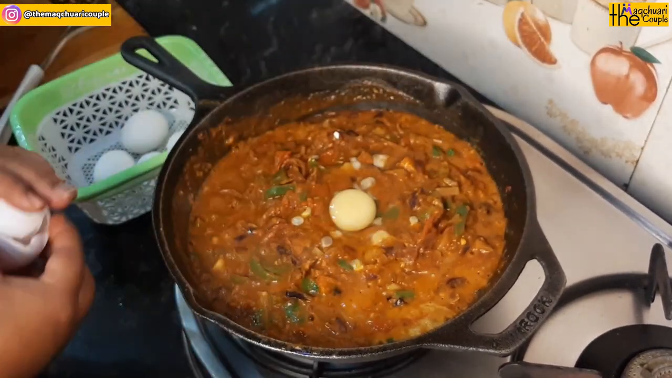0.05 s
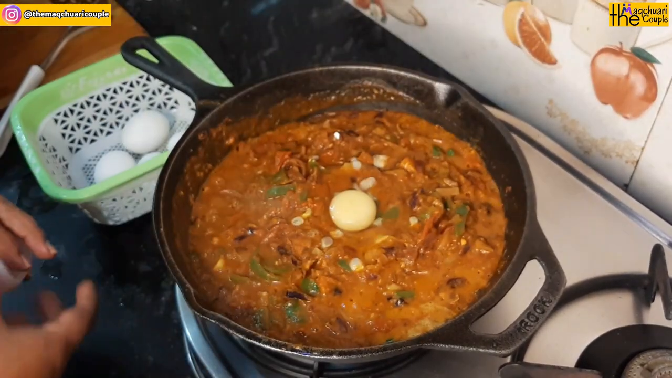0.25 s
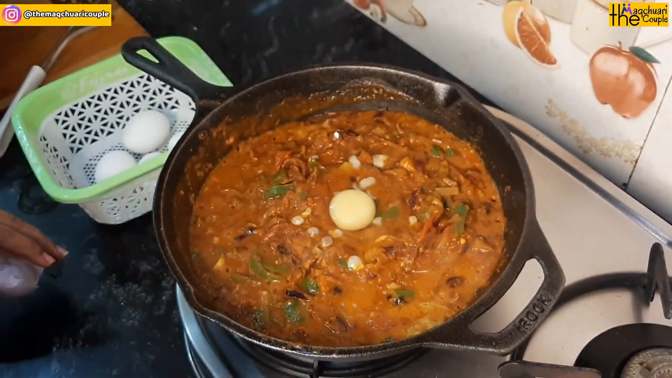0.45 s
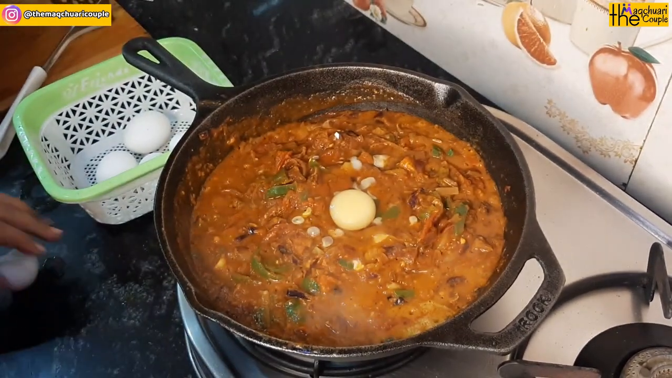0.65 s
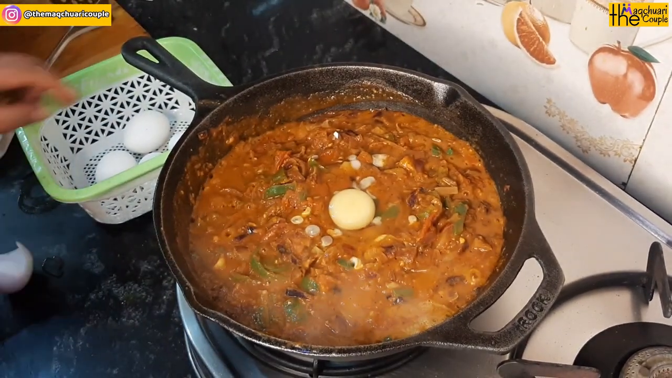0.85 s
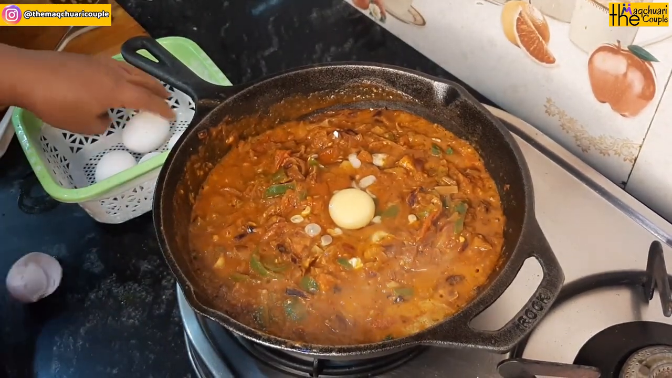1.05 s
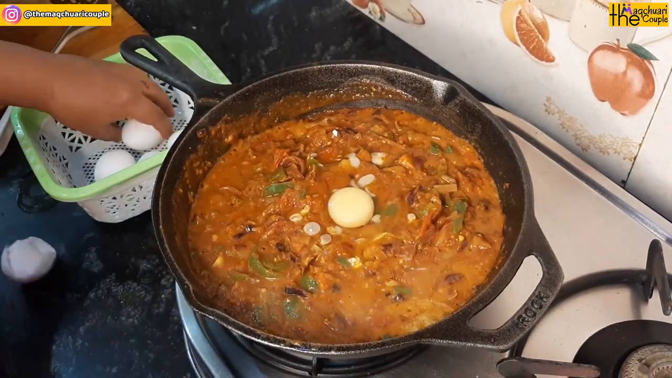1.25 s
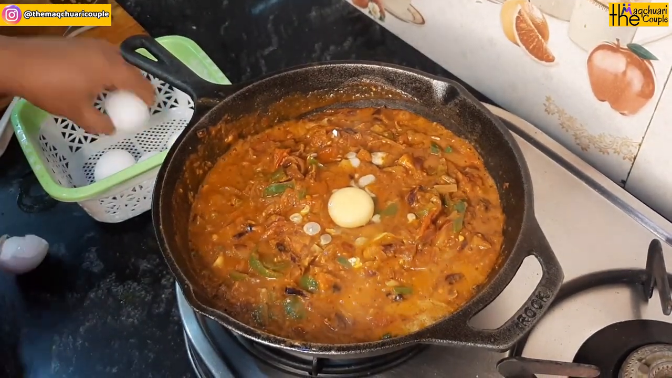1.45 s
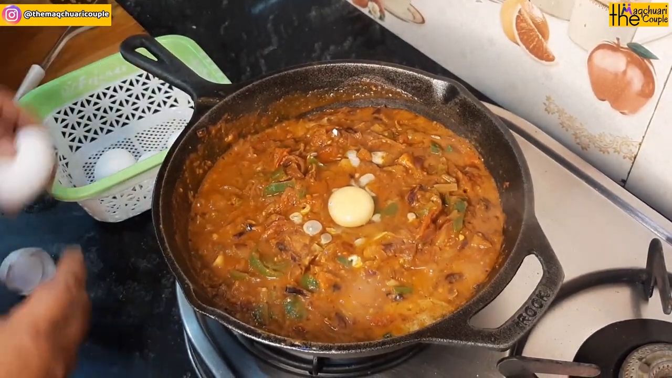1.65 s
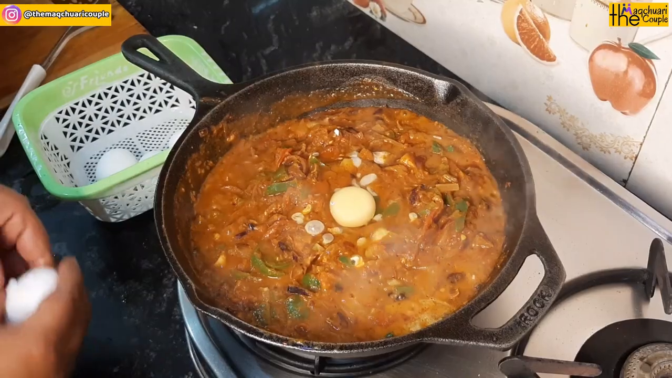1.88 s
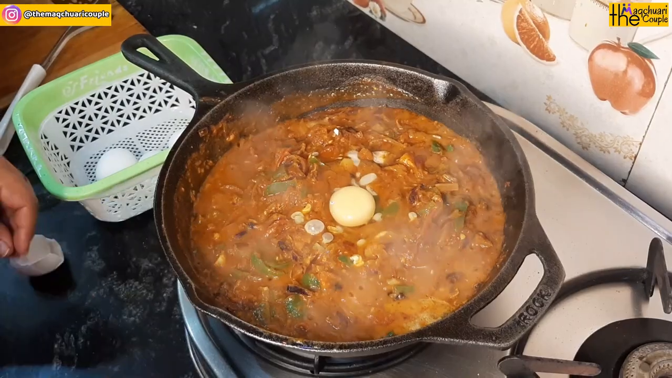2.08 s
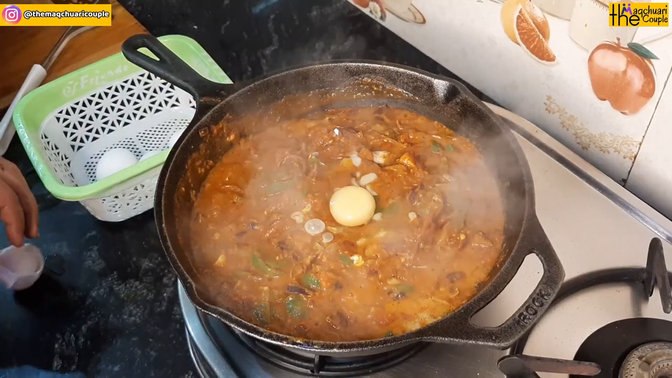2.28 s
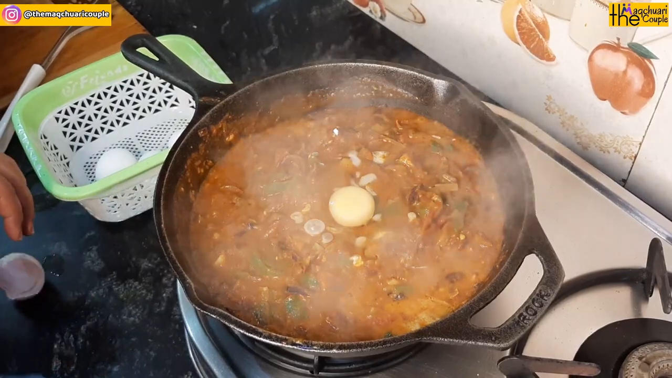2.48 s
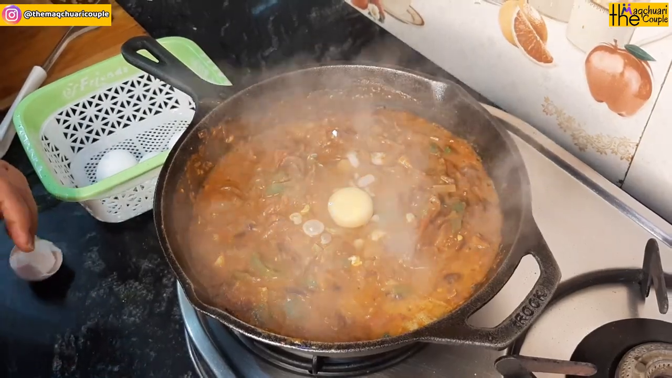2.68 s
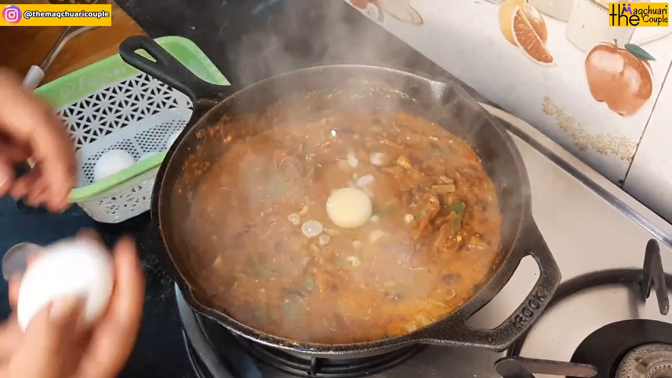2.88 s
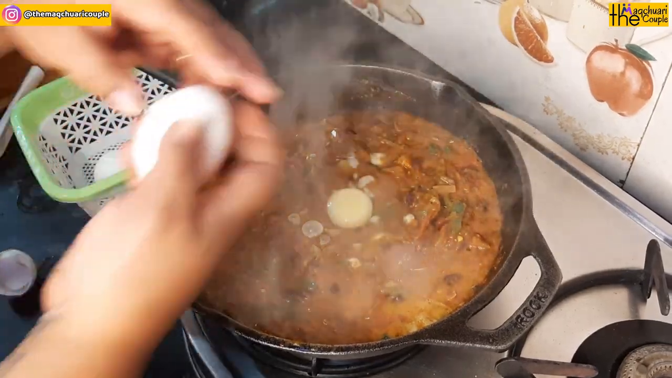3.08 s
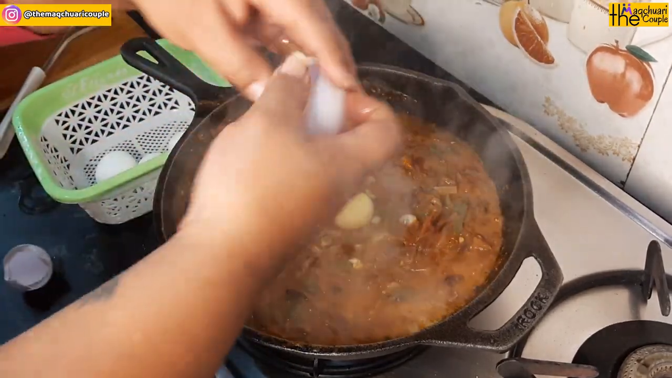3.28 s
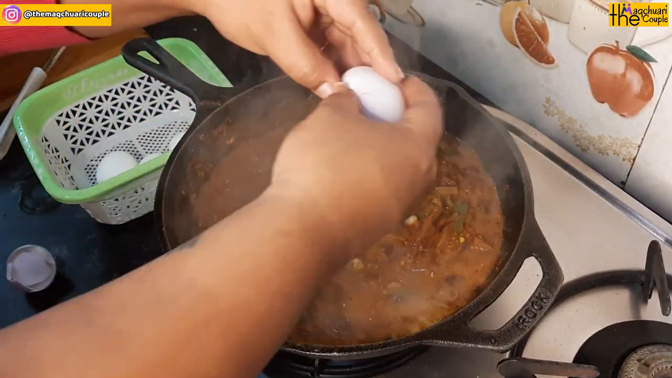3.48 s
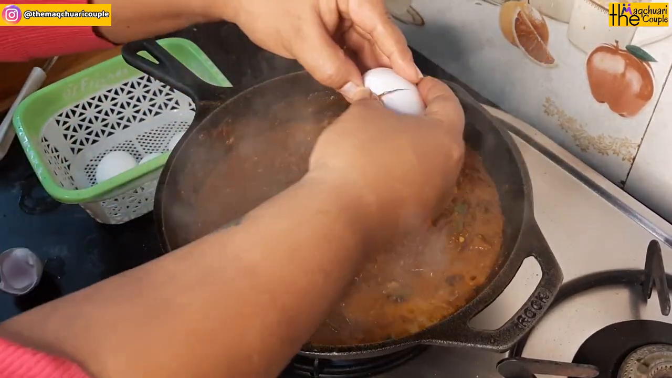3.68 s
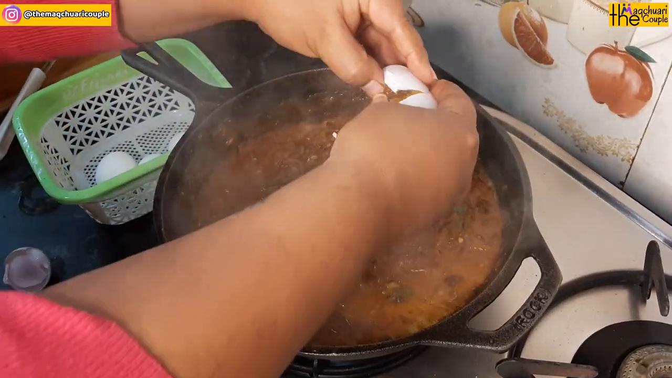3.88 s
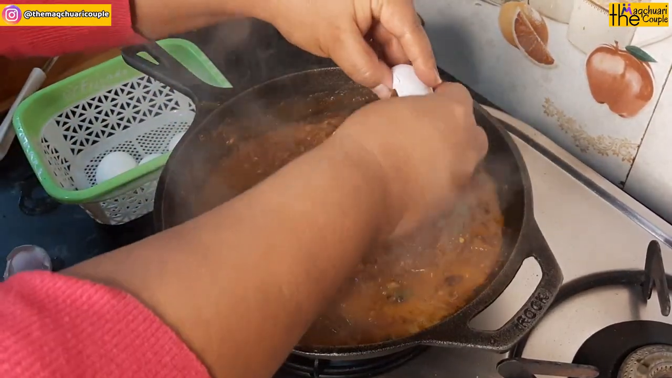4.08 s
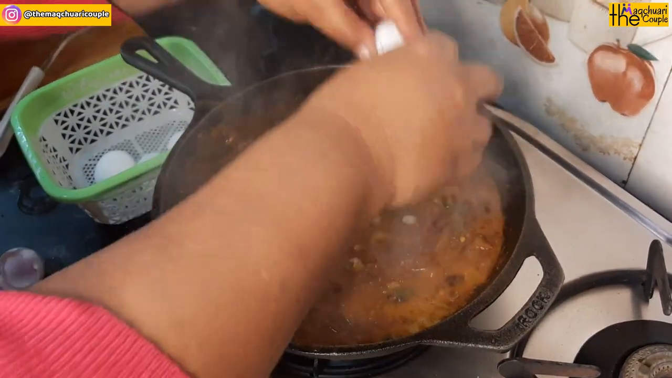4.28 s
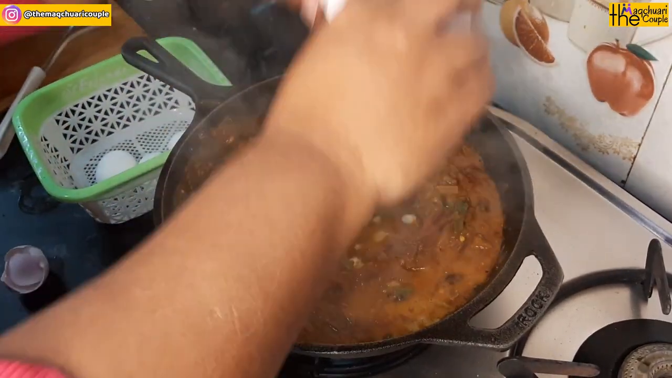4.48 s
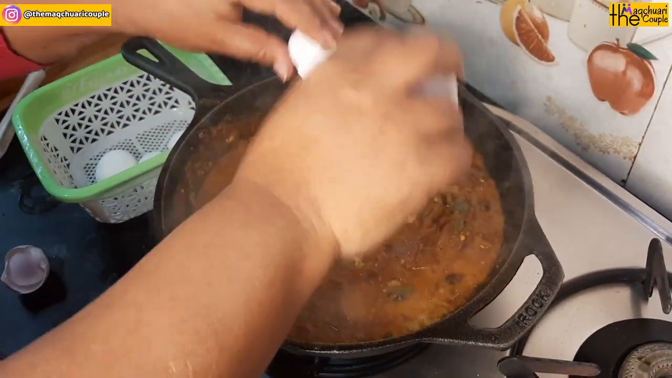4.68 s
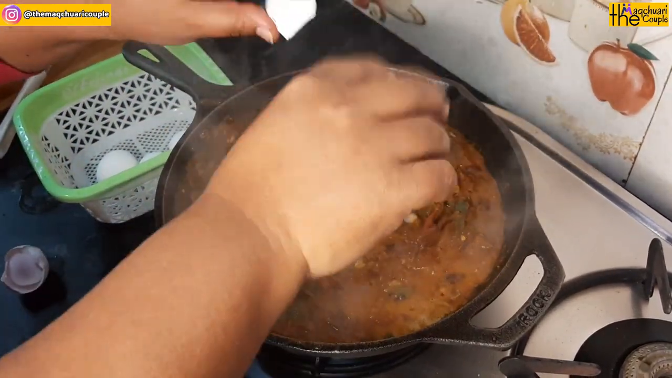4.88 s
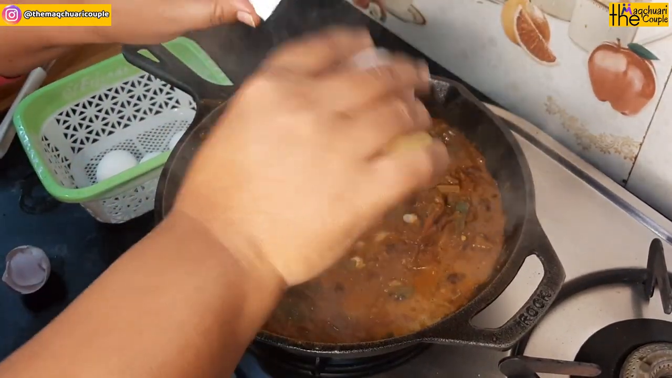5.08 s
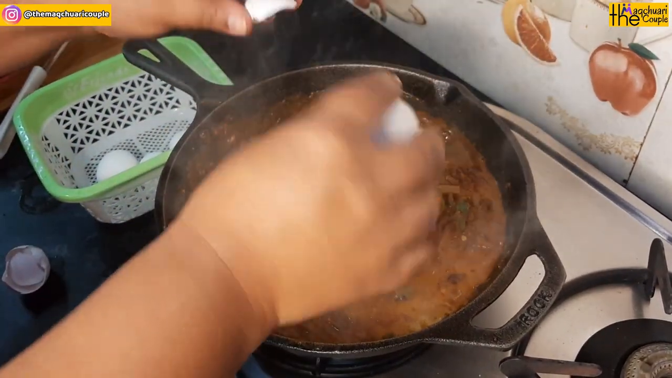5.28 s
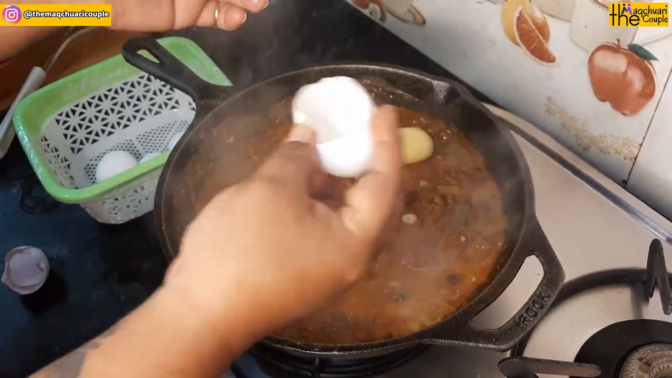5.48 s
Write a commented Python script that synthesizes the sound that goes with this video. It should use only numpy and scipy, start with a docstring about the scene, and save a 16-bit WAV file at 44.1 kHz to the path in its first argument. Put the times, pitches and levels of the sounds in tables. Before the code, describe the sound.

Gravy sizzles softly in a skillet throughout, a fine hiss with tiny bubble pops over the faint, low flutter of a gas flame. For the first 0.6 seconds an emptied eggshell crackles between fingers in short, brittle bursts. At 0.7 seconds it drops onto a stone counter with a sharp click and a brief hollow ring. From about 1.1 to 1.7 seconds come light taps as an egg is lifted from a plastic basket. At about 2.4, 2.55 and 2.7 seconds the egg is knocked on the counter, each crisp crack carrying a dull cabinet thump, the middle one weaker. From 3.5 to 4.3 seconds the shell is pulled apart with quieter crunches, snaps and ticks, and a faint low puff near 3.8 seconds. Only the sizzle and flame continue until the end, around 5.6 seconds. Everything sounds close, with the short reverberation of a tiled kitchen.

```python
"""An egg is knocked three times on a stone counter and pulled apart over a skillet in a tiled kitchen.
Its brittle shell fractures in bursts of tiny snaps, and each blow thumps the counter and its cabinet.
Before that, an emptied shell crackles in the fingers and is dropped, ringing like a small cup, and the
egg is lifted from a plastic basket with light taps. Throughout, bursting bubbles make gravy sizzle
softly over the low flutter of a gas flame."""
import sys
import numpy as np
from scipy import signal
from scipy.fft import rfft, irfft, next_fast_len
from scipy.io import wavfile

SR = 44100
rng = np.random.default_rng(int(sys.argv[2]) if len(sys.argv) > 2 else 0)


def dump_mix(stems):
    """Bounce the given channels to the path in sys.argv[1] as a 16-bit WAV at rate SR."""
    frames = np.atleast_2d(stems).T  # one column per channel
    limited = np.clip(frames, -1, 1)  # hard clip at full scale
    pcm = np.round(limited * 32767).astype(np.int16)
    wavfile.write(sys.argv[1], SR, pcm)


N = 244387
TIME = np.arange(N) / SR

# The empty shell lands. Each row: start in seconds, level in dB, thump in dB.
SHELL_DROPS = [(.679, 5.5, -18)]
# The egg hits the counter. Each row: start in seconds, crack in dB, thump in dB, egg's pitch in Hz.
EGG_KNOCKS = [(2.3675, 4.5, 2, 1523), (2.5445, -5.5, -2, 1520), (2.6748, 3.5, 0.5, 664)]


def from_db(db):
    """Amplitude grows tenfold with every 20 dB."""
    return 10 ** (np.asarray(db) / 20)


def unit_rms(x):
    """Normalisation to a mean power of 1."""
    return x / np.sqrt(np.mean(x ** 2) + 1e-20)


def unit_energy(x):
    """Normalisation to the energy of a unit impulse."""
    return x / np.sqrt(np.sum(x ** 2) + 1e-20)


def at_hz(points, hz):
    """Interpolation on a logarithmic frequency axis."""
    frequencies, values = np.transpose(points)
    return np.interp(np.log(np.maximum(hz, 1)), np.log(frequencies), values)


def add(track, start_s, sound):
    """Superposition: a short sound sums into a track."""
    i = max(int(round(start_s * SR)), 0)
    track[..., i:i + sound.shape[-1]] += sound[..., :N - i]


def pan(db):
    """Level difference between the channels; positive favours the left."""
    return from_db(np.array([[db], [-db]]) / 2)


def coloured(x, spectrum, size=8192):
    """Minimum-phase filtering: folding the cepstrum gives a causal response with this spectrum."""
    gain = from_db(at_hz(spectrum, np.fft.rfftfreq(size, 1 / SR)))
    cepstrum = irfft(np.log(gain))
    fold = np.r_[1, np.full(size // 2 - 1, 2), 1, np.zeros(size // 2 - 1)]
    response = irfft(np.exp(rfft(cepstrum * fold)))
    return np.apply_along_axis(lambda v: signal.fftconvolve(v, response)[:len(v)], -1, x)


def ring(x, hz, t60):
    """Damped resonance: one mode, falling 60 dB in t60 seconds and radiating no bass."""
    radius, angle = from_db(-60 / (t60 * SR)), 2 * np.pi * hz / SR
    return signal.lfilter([.5, 0, -.5], [1, -2 * radius * np.cos(angle), radius * radius], x + 1e-18)


def mode_cluster(x, hz, t60):
    """Modal vibration of a curved shell: a main mode and two weaker neighbours."""
    return unit_energy(ring(x, hz, t60) + 0.22 * ring(x, hz * 0.85, t60) + 0.25 * ring(x, hz * 1.12, t60))


def diffuse(pair):
    """A diffuse field is coherent at two nearby points in the bass and incoherent in the treble."""
    # Likeness of left and right. Each row: frequency in Hz, correlation.
    coherence = [(100, 0.91), (350, 0.77), (700, 0.75), (1100, 0.066), (1800, -0.074), (2800, -0.0072),
                 (5000, -0.024), (16000, 0.042)]
    size = pair.shape[1]
    fft_size = next_fast_len(size + SR // 20)
    alike = at_hz(coherence, np.fft.rfftfreq(fft_size, 1 / SR))
    mid, side = rfft(pair, fft_size) * np.sqrt([(1 + alike) / 2, (1 - alike) / 2])
    return irfft(np.array([mid + side, mid - side]), fft_size)[:, :size]


def clicks(per_s, spread_db, size):
    """A Poisson process: random impulses of either sign, a few much larger than the rest."""
    born = rng.random(size) < per_s / SR
    return born * rng.choice([-1, 1], size) * from_db(spread_db * np.minimum(rng.exponential(1, size), 4))


def snap_burst(envelope, per_s, spread_db):
    """Acoustic emission: tiny snaps under an envelope, radiating differently to left and right."""
    snaps = np.array([clicks(per_s, spread_db, len(envelope)) for _ in range(2)]) * envelope
    return np.sqrt(2) * unit_energy(diffuse(snaps))


def kitchen_response(early_db, tail_db, early_s=0.0013, build_s=0.0067):
    """Early reflections from counter, pan and tiles precede reverberation that decays band by band."""
    # The kitchen's decay. Each row: frequency in Hz, reverberation time in seconds.
    reverb_times = [(200, 0.41), (900, 0.62), (1800, 0.62), (5000, 0.51), (8000, 0.44), (15000, 0.36)]
    t, hz = TIME[:SR], np.fft.rfftfreq(SR, 1 / SR)
    white = rfft(rng.standard_normal((2, SR)))
    edges_hz = np.geomspace(150, 20000, 16)
    tail = np.zeros((2, SR))
    for low, high in zip(edges_hz, edges_hz[1:]):
        band = irfft(white * ((hz >= low) & (hz < high)), SR)
        tail += band * from_db(-60 * t / at_hz(reverb_times, np.sqrt(low * high)))
    tail = unit_energy(tail * (1 - np.exp(-t / build_s)))
    early = unit_energy(rng.standard_normal((2, SR)) * t * np.exp(-t / early_s))
    return diffuse(from_db(early_db) * early + from_db(tail_db) * tail)


def in_kitchen(x, early_db, tail_db, lag_ms=0):
    """Direct sound plus reflections; a path difference delays the direct sound on the right."""
    pair = x * np.ones((2, 1))
    direct = np.array([pair[0], np.roll(pair[1], round(lag_ms * SR / 1000))])
    return direct + signal.fftconvolve(pair, kitchen_response(early_db, tail_db), axes=1)[:, :N]


def gas_flame():
    """Combustion noise: the fluttering flame radiates a low rumble."""
    # Spectrum of the flame. Each row: frequency in Hz, relative level in dB.
    flame_spectrum = [(20, 9.5), (40, -9.5), (70, -1.5), (100, 2), (150, -5.5), (210, -9.5), (270, -3.5),
                      (380, -15), (700, -6), (3000, -52)]
    return unit_rms(coloured(diffuse(rng.standard_normal((2, N))), flame_spectrum))


def air_puff(start_s=3.785, attack_s=0.02, decay_s=0.18, band_hz=(10.2, 75.5)):
    """Air displaced as the egg opens makes a soft swell of deep noise."""
    band = signal.butter(2, band_hz, "band", fs=SR, output="sos")
    age = np.maximum(TIME - start_s, 0)
    envelope = (1 - np.exp(-age / attack_s)) * np.exp(-age / decay_s)
    return envelope * unit_rms(signal.sosfilt(band, rng.standard_normal(N)))


def bubbles(per_s=260, spread_db=2, cycles=13, sizes=20):
    """Bubble resonance: each bursts at random and rings briefly at a pitch set by its size."""
    voices = (ring(clicks(per_s / sizes, spread_db, N), hz, cycles / hz)
              for hz in np.geomspace(600, 6500, sizes))
    return unit_rms(sum(unit_rms(voice) for voice in voices))


def gravy_sizzle(hiss_db=5.5, pops_db=-5.5, spits_db=-8.5):
    """Countless bursts sum incoherently to a hiss; single bubbles and spits of fat stand out a little."""
    # Spectrum of hiss and spits. Each row: frequency in Hz, relative level in dB.
    sizzle_spectrum = [(250, -12), (430, -8), (620, -6.5), (830, 10.5), (1200, 0), (1530, 9), (1750, 2),
                       (2050, 6.5), (2500, -0.5), (3300, 0), (4500, 0), (7000, -4), (11000, 5),
                       (16000, -2.5)]
    # Vigour of the simmer. Each row: time in seconds, level in dB.
    simmer = [(0.0, -53), (1.62, -56), (2.41, -52), (2.59, -52), (2.78, -54.5), (3.13, -54), (4.86, -57),
              (5.54, -55.5)]
    hiss = unit_rms(coloured(diffuse(rng.standard_normal((2, N))), sizzle_spectrum))
    pops = unit_rms(in_kitchen(bubbles(), early_db=10, tail_db=4))
    spits = in_kitchen(clicks(per_s=45, spread_db=5, size=N), early_db=6, tail_db=2)
    spits = unit_rms(coloured(spits, sizzle_spectrum))
    vigour = from_db(np.interp(TIME, *np.transpose(simmer)))
    return vigour * (from_db(hiss_db) * hiss + from_db(pops_db) * pops + from_db(spits_db) * spits)


def light_touches(scuff_s=0.012, cycles=30, clunk_db=-6, clunk_low_hz=200):
    """Impact and friction: a tap and scuff ring modes over a dull clunk; higher modes die sooner."""
    # Touches of egg, basket and shell. Each row: start in seconds, relative level in dB, pitch in Hz.
    touches = [(1.125, -22, 930), (1.168, -25, 790), (1.282, -11.5, 1330), (1.295, -13, 1180),
               (1.382, -21, 4360), (1.731, -20, 1730), (3.845, -21.5, 1220), (4.068, -20.5, 1074),
               (4.283, -21.5, 1580)]
    out, t = np.zeros(N), TIME[:SR // 8]
    for start, db, hz in touches:
        scuff = unit_energy(rng.standard_normal(len(t)) * np.exp(-t / scuff_s))
        contact = (t == 0) + scuff
        band = signal.butter(2, [clunk_low_hz, hz], "band", fs=SR, output="sos")
        clunk = from_db(clunk_db) * unit_energy(signal.sosfilt(band, contact))
        add(out, start, from_db(db) * (mode_cluster(contact, hz, cycles / hz) + clunk))
    return out


def counter_thumps(contact_s=0.00045, softening=0.78):
    """Force pulses drive the slab's modes; each dent lengthens the contact and so dulls the blow."""
    # Modes of counter, cabinet and room. Each row: frequency in Hz, gain in dB, t60 in seconds.
    modes = [(58.6, -40, 0.35), (85.74, -32, 0.69), (105.5, -29.5, 0.63), (135.7, -32.5, 0.32),
             (181, -36, 0.1), (220, -30.5, 0.068), (267, -26.5, 0.1), (371, -43.5, 0.1), (420, -59, 0.052),
             (925, -23, 0.023), (970, -57, 0.021), (1410, -22, 0.045)]
    blows, t = np.zeros(N), TIME[:SR // 50]
    for hits in (EGG_KNOCKS, SHELL_DROPS):
        for dents, (start, _, thump_db, *_) in enumerate(hits):
            force = np.exp(-t / (contact_s * (1 + softening * dents)))
            add(blows, start, from_db(thump_db) * force / force.sum())
    return sum(from_db(db) * ring(blows, hz, t60) for hz, db, t60 in modes)


def shell_crunches(snap_s=0.0045, swell=0.12, hollow_t60=0.026):
    """Cracks spread under the fingers in bursts of snaps that excite the shell's cavity resonance."""
    # The shell crumbles. Each row: start in seconds, level in dB, length in seconds.
    crumbles = [(0.037, -19, 0.017), (0.105, -8, 0.064), (0.196, -11, 0.041), (0.242, -13, 0.021),
                (0.347, -17.5, 0.021), (0.557, -15, 0.072), (3.591, -18.5, 0.05), (3.812, -17.5, 0.022),
                (3.835, -11.5, 0.026), (3.878, -20, 0.028)]
    # A piece snaps off at once. Each row: start in seconds, level in dB, extra ring in dB.
    breaks = [(0.222, -13.5, -12), (0.315, -14, -25), (3.469, -22.5, -6), (3.9964, -16.5, 6.5),
              (4.0688, -20, 8)]
    # Spectrum of the crunch. Each row: frequency in Hz, gain in dB.
    crunch_spectrum = [(50, -43), (400, -10.5), (900, -4), (1500, 1), (2000, -3), (2500, -5.5), (4200, 0),
                       (7000, -1), (11000, 6), (16000, 1)]
    empty_shell, opening_egg = (1800, -3), (2080, 2.2)   # each hollow's pitch in Hz and ring in dB
    out, t = np.zeros((2, N)), TIME[:SR // 4]
    slow = [(start, db, length, 0) for start, db, length in crumbles]
    quick = [(start, db, snap_s, ring_db) for start, db, ring_db in breaks]
    for start, db, length, ring_db in slow + quick:
        hz, hollow_db = empty_shell if start < SHELL_DROPS[0][0] else opening_egg
        envelope = (1 - np.exp(-t / (swell * length))) * np.exp(-(t / length) ** 2)
        snaps = snap_burst(envelope, per_s=4500, spread_db=3)
        hollow = from_db(ring_db + hollow_db) * mode_cluster(snaps, hz, hollow_t60)
        add(out, start, from_db(db) * (snaps + hollow))
    return coloured(out, crunch_spectrum)


def dropped_shell(chatter_s=0.0038):
    """Impact on stone: the rim chatters and the cup rings, neighbouring modes in opposite phase."""
    # Modes of the empty shell. Each row: frequency in Hz, gain in dB, t60 in seconds.
    modes = [(1520, -20.5, 0.017), (1793, -21, 0.033), (1970, -17, 0.016), (2750, -31.5, .015),
             (3320, -28.5, 0.016)]
    # Spectrum of the chatter. Each row: frequency in Hz, gain in dB.
    chatter_spectrum = [(30, -44), (200, -20), (500, -19), (850, -1), (1200, -2.5), (1550, 8), (2050, -1),
                        (2450, -1.5), (3200, 2.5), (4100, -6), (5200, 0), (7500, -11), (11000, -0.5),
                        (16000, -9)]
    blow, rim, t = np.zeros(N), np.zeros((2, N)), TIME[:SR // 8]
    for start, db, _ in SHELL_DROPS:
        add(blow, start, from_db([db]))
        add(rim, start, from_db(db) * snap_burst(np.exp(-t / chatter_s), per_s=18000, spread_db=4))
    cup = sum((-1) ** k * from_db(db) * ring(blow, hz, t60) for k, (hz, db, t60) in enumerate(modes))
    return coloured(rim, chatter_spectrum) + cup


def egg_knocks(first_snap_db=1, give_s=0.00046, crumble_s=0.0091):
    """Brittle fracture: the first knock snaps the intact shell; later ones only crumble the dent."""
    # Spectrum of the crack. Each row: frequency in Hz, gain in dB.
    crack_spectrum = [(30, -50), (120, 5), (330, 4.5), (520, 4.5), (900, 4), (1600, 3.5), (2100, 3),
                      (2700, -3.5), (3600, -1), (5300, 0.5), (7300, -1), (11000, 3.5), (16000, -3.5)]
    ring_db, dent_loss_db, egg_t60 = -7, 3.5, 0.026   # the full egg rings dully, less with every dent
    cracks, t = np.zeros((2, N)), TIME[:SR // 6]
    impulse = 1. * (t == 0)
    envelope = (1 - np.exp(-t / give_s)) * np.exp(-t / crumble_s)
    add(cracks, EGG_KNOCKS[0][0], from_db(first_snap_db) * impulse)
    for dents, (start, crack_db, _, hz) in enumerate(EGG_KNOCKS):
        crumble = from_db(crack_db) * snap_burst(envelope, per_s=7400, spread_db=1)
        egg = from_db(ring_db - dent_loss_db * dents) * mode_cluster(impulse, hz, egg_t60)
        add(cracks, start, crumble + egg)
    return coloured(cracks, crack_spectrum)


def scene():
    """Time and level cues: the counter is heard first on the left, the stove louder on the right."""
    crunches = in_kitchen(shell_crunches(), early_db=4.5, tail_db=-2, lag_ms=0.03) * pan(-0.18)
    touches = in_kitchen(light_touches(), early_db=4, tail_db=0, lag_ms=0.1) * from_db(-4.5)
    drop = in_kitchen(dropped_shell(), early_db=5, tail_db=2, lag_ms=0.2) * pan(-0.22)
    knocks = in_kitchen(egg_knocks(), early_db=2.5, tail_db=-3.5, lag_ms=0.22) * pan(0.13)
    thumps = in_kitchen(counter_thumps(), early_db=-13, tail_db=4, lag_ms=0.2) * pan(-2.2)
    gravy = gravy_sizzle() * pan(-1.86)
    rumble = (from_db(-56.5) * gas_flame() + from_db(-46) * air_puff()) * pan(-4.5)
    return rumble + gravy + touches + thumps + crunches + drop + knocks


def record(dry, cutoff_hz=15900):
    """Band limiting: the microphone loses the deepest bass and notches the treble; the top is cut."""
    # The microphone's response. Each row: frequency in Hz, gain in dB.
    microphone = [(15, -47), (25, -17), (38, -1.5), (7800, 3.5), (8400, -8), (9700, -9), (11500, -6.5),
                  (16000, -4)]
    low_pass = signal.ellip(14, .1, 110, cutoff_hz, fs=SR, output="sos")
    return signal.sosfilt(low_pass, coloured(dry, microphone))


dry = scene()
out = record(dry)
dump_mix(out)
```